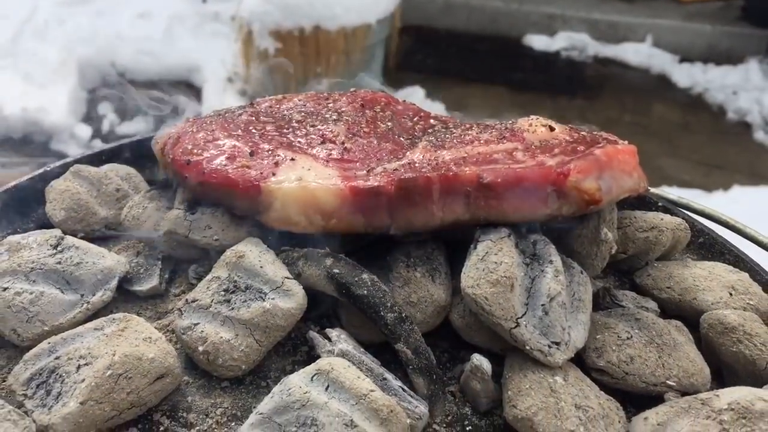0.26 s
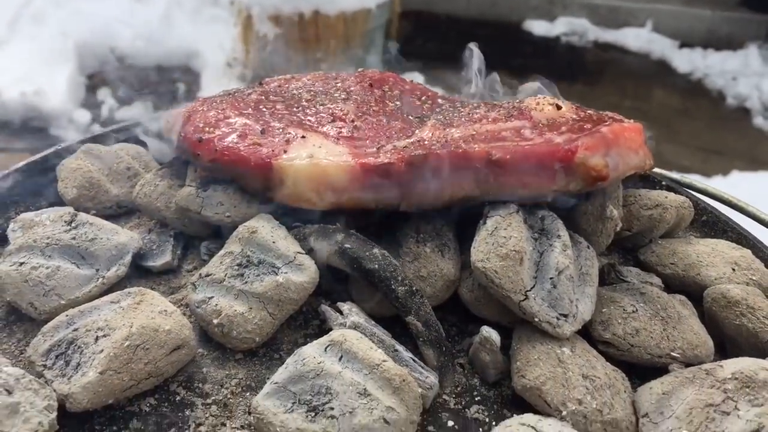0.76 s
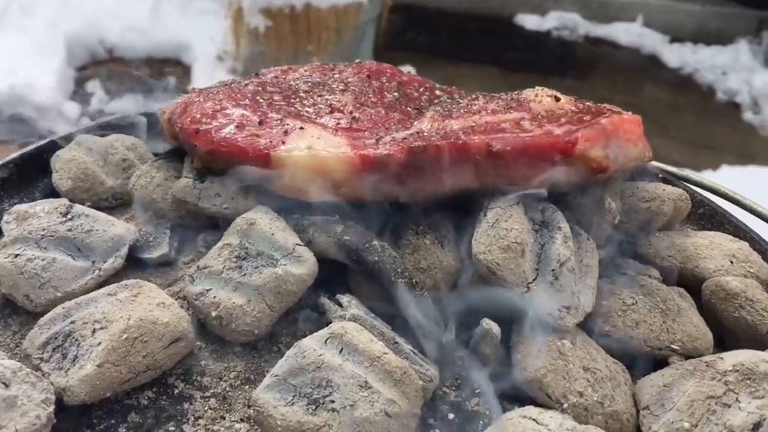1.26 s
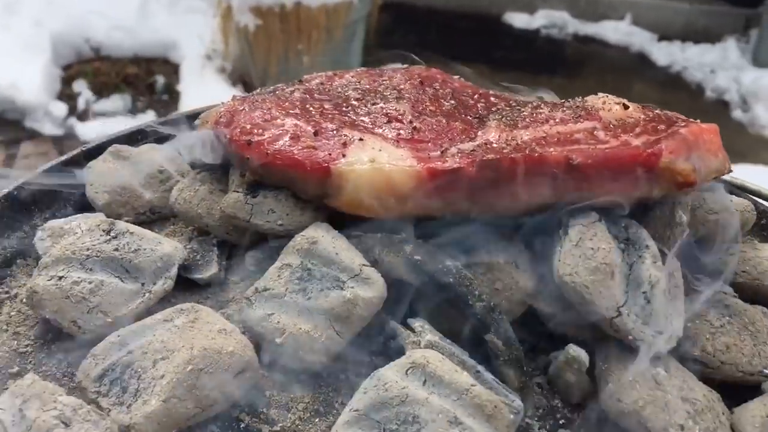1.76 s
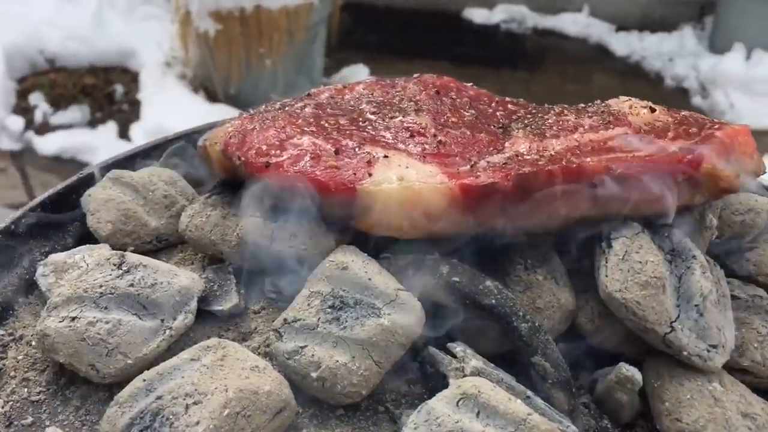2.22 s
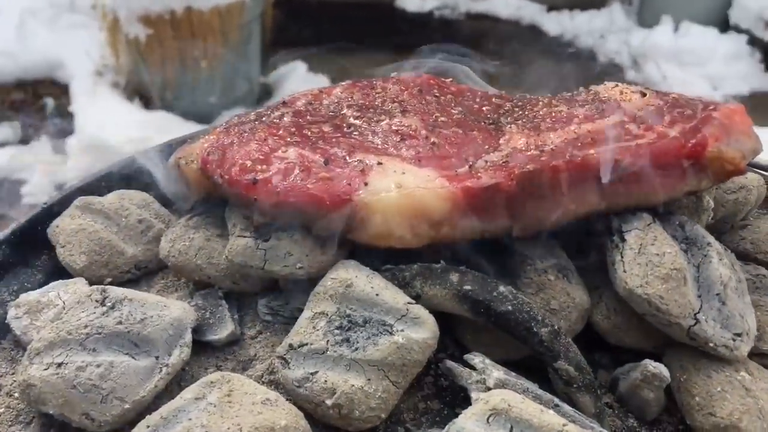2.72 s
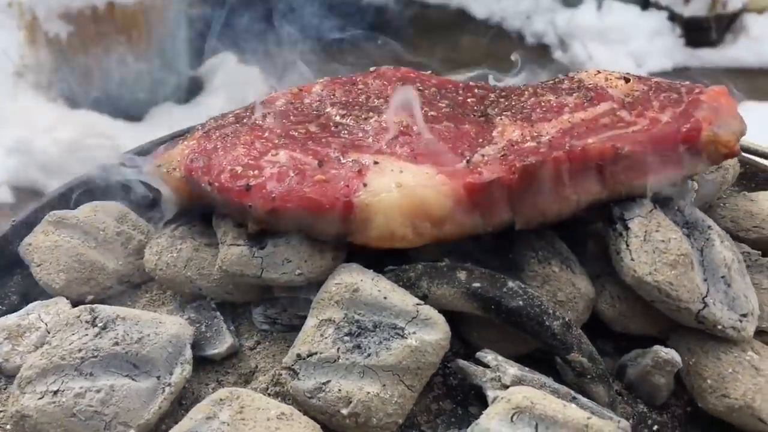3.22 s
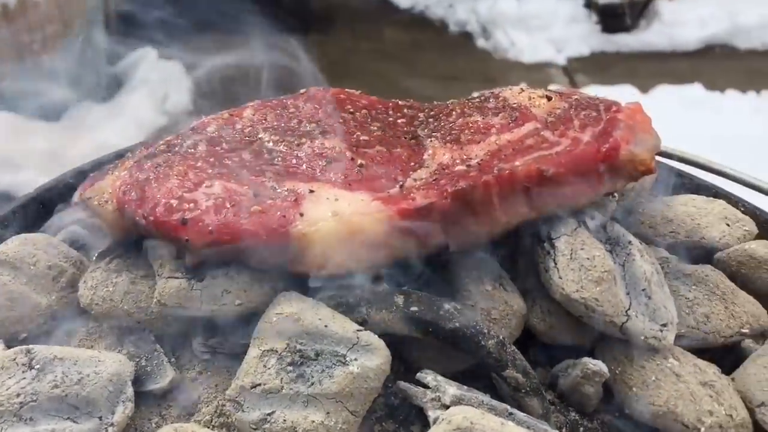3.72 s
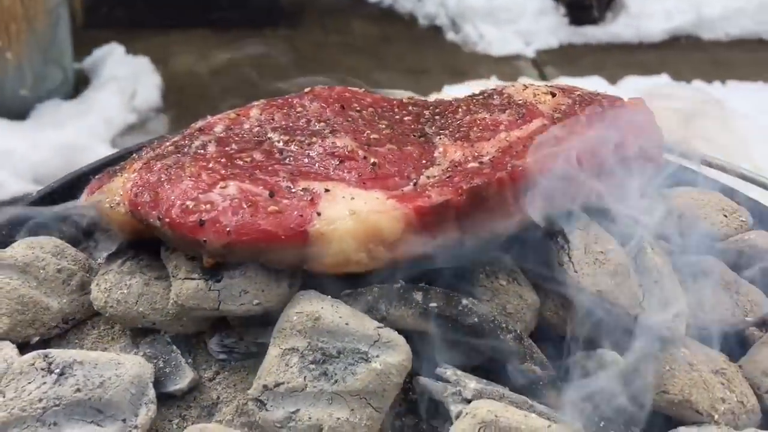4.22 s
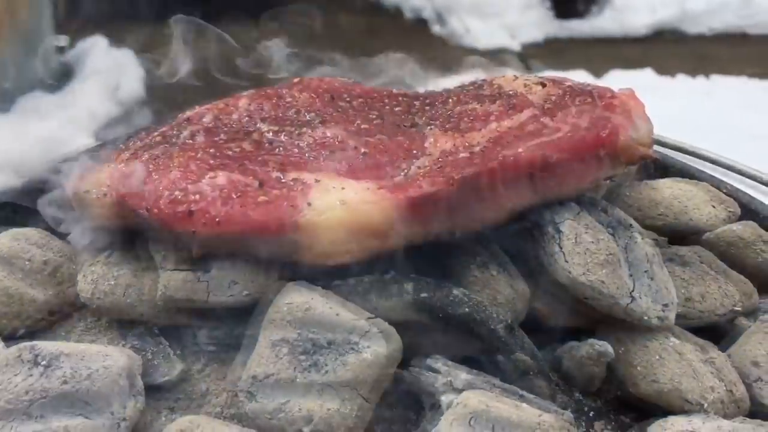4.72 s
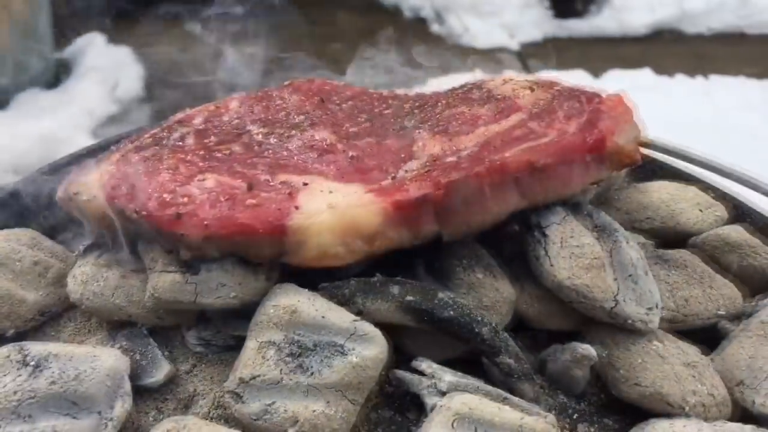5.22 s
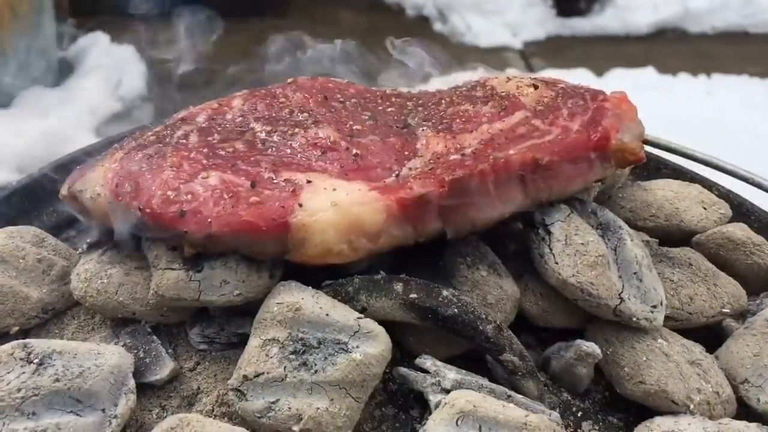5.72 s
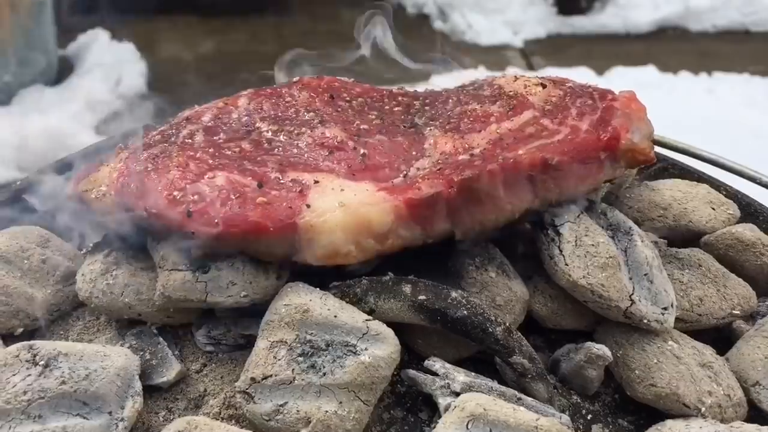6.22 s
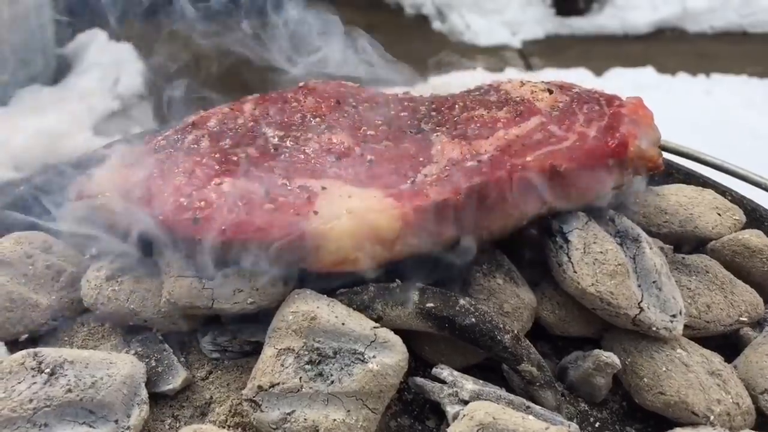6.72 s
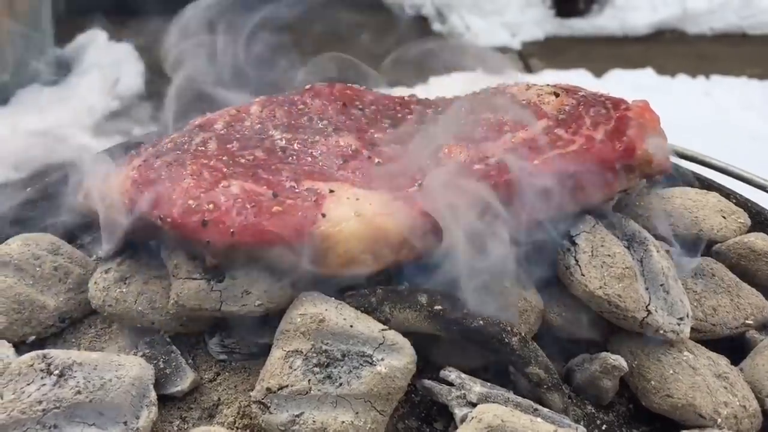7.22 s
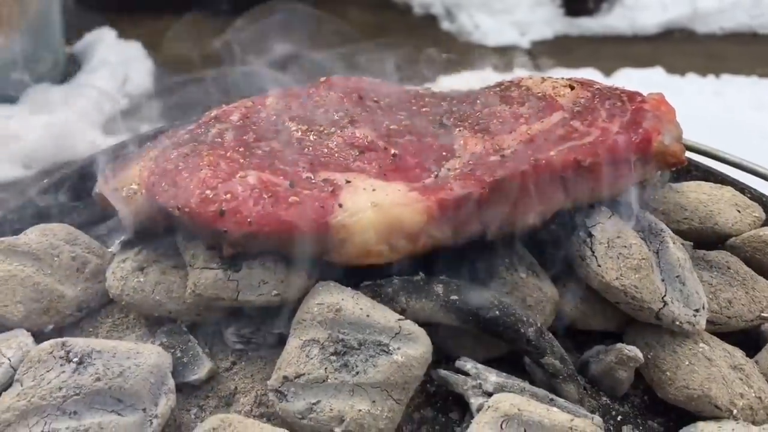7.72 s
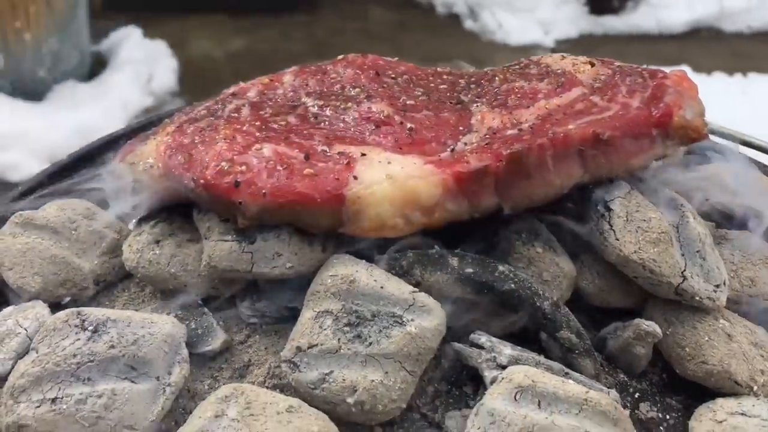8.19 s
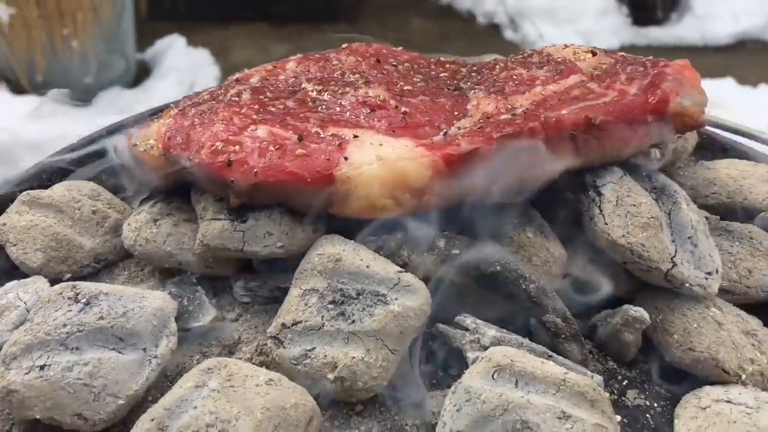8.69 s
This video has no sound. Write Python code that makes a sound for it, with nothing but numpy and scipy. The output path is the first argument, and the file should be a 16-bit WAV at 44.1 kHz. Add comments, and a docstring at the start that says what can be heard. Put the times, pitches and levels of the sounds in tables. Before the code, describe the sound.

Meat sizzles steadily on coals in the open air, with the microphone close to it. From the start, sharp snaps and wet pops break through the crackling hiss, singly and in quick clusters. Past the middle the popping gets busier, with short spits of fat and a few tiny steam whistles. The sizzle ends a little quieter, over a faint rumble of hot air.

```python
"""A steak sears on glowing charcoal outdoors, a phone held close by.
From the start juice boils into a hiss of tiny bursts and pockets of steam and fat pop and spit,
coloured by the gaps between the coals, over a low flutter of hot air with a few puffs.
From 2.8 s fat flares up after some big pops; from 5.8 s pores whistle briefly.
At 7.5 s a faint low drone enters for about a second, and the sizzle ends a little quieter."""
import sys
import numpy as np
from scipy import signal
from scipy.fft import rfft, irfft
from scipy.io import wavfile
from scipy.ndimage import uniform_filter1d

SR = 44100
rng = np.random.default_rng(int(sys.argv[2]) if len(sys.argv) > 2 else 0)


def file_out(sig):
    """Save sig as 16-bit WAV at sys.argv[1]."""
    # one column per channel
    cols = np.atleast_2d(sig).T
    # limit, then scale
    lim = np.clip(cols, -1, 1)
    pcm = np.round(lim * 32767).astype(np.int16)
    wavfile.write(sys.argv[1], SR, pcm)


N = 394694

# response of the gaps between the coals: (frequency [Hz], gain [dB])
COAL_GAPS = [(250, -24), (450, -16), (800, -8), (1550, 0), (2350, -8), (3000, -3), (4200, -4), (4850, -8),
             (6000, -6), (7700, -11), (9400, -11), (10400, -17), (11200, -12), (13500, -10), (15800, -12)]


def undb(db):
    return 10 ** (np.asarray(db) / 20)


def unit_rms(x):
    return x / np.sqrt(np.mean(x ** 2))


def band(x, lo_hz, hi_hz, order=2):
    return signal.sosfilt(signal.butter(order, [lo_hz, hi_hz], "band", fs=SR, output="sos"), x)


def colour(x, response, size=512):
    """Minimum-phase filter (folded cepstrum) along the last axis."""
    hz, db = np.transpose(response)
    gain_db = np.interp(np.log(np.fft.rfftfreq(size, 1 / SR) + 1), np.log(hz), db)
    cepstrum = irfft(np.log(undb(gain_db)))
    cepstrum[1:size // 2] *= 2
    cepstrum[size // 2 + 1:] = 0
    impulse = np.array(irfft(np.exp(rfft(cepstrum))), ndmin=x.ndim)
    return signal.oaconvolve(x, impulse, axes=-1)[..., :x.shape[-1]]


def flicker(rate_hz):
    """Random steps, smoothed twice; RMS 1."""
    hold = int(SR / rate_hz)
    steps = np.repeat(rng.standard_normal(N // hold + 1), hold)
    return unit_rms(uniform_filter1d(uniform_filter1d(steps, hold), hold)[:N])


def bursts(start_s, tear_ms, parts_db, size=1536):
    """Pockets tear open as ragged noise; each band then dies at its own pace, trailed by spray."""
    # thud, thump, knock, snap, spit: (low edge [Hz], high edge [Hz])
    bands_hz = [(90, 420), (450, 1050), (850, 2600), (2400, 6500), (5800, 13600)]
    # ring of each band after the tear: (decay time [ms])
    tails_ms = [7.3, 1.15, 0.42, 0.6, 0.043]
    rise_share, spray_db, spray_ms = 0.27, -21.5, 38
    t_ms = np.arange(size) / SR * 1000
    tear_ms = np.clip(tear_ms, 0.2, 20)[:, None]
    after_ms = np.maximum(t_ms - tear_ms, 0)
    ragged = rng.standard_normal((len(start_s), size))
    ragged *= undb(12 * uniform_filter1d(rng.standard_normal(ragged.shape), size=16))
    rise = np.minimum(t_ms / (rise_share * tear_ms), 1)
    sag = np.exp(-0.5 * np.minimum(t_ms / tear_ms, 1))
    spray = undb(spray_db) * np.exp(-after_ms / spray_ms)
    sound = 0
    for (lo_hz, hi_hz), tail_ms, db in zip(bands_hz, tails_ms, parts_db.T):
        part = ragged * rise * sag * (np.exp(-after_ms / tail_ms) + spray)
        if lo_hz < 400:  # thud: too long a wave for the gaps to colour
            part = band(part, lo_hz, hi_hz, order=1)
        else:
            part = band(colour(part, COAL_GAPS), lo_hz, hi_hz)
        tear_power = np.sum(part ** 2, axis=1, keepdims=True) / (tear_ms * SR / 1000)
        sound = sound + part / np.sqrt(tear_power) * undb(db)[:, None]
    out = np.zeros(N + size)
    index = (start_s * SR).astype(int)[:, None] + np.arange(size)
    np.add.at(out, index, sound * np.hanning(2 * size)[size:])
    return out[:N]


def pops():
    """Loud pockets of steam and fat: tight ones bright, wet ones dark; some spit fat."""
    # (time [s], tearing time [ms], level [dB], brightness [dB], spit re level [dB])
    pockets = [(0.205, 1.14, -35.5, 18, 4), (0.3197, 0.63, -32, 1, 4), (0.3291, 0.98, -35.5, -10.5, 3),
               (0.4373, 0.34, -24.5, -2, 3), (0.473, 0.41, -55, 8, -1), (0.6367, 0.8, -22, -5, -7),
               (0.6635, 2.1, -35, -4.5, 1), (0.7128, 0.91, -33, -5.5, 0), (0.7208, 0.97, -27, -5, -2),
               (0.7583, 0.69, -36.5, -7, -5), (0.7663, 0.81, -26, -6, -8), (0.791, 0.23, -30.5, 2, 13.5),
               (0.8029, 1.37, -18, -4, -16), (0.9306, 0.75, -31.5, -0.5, -2), (0.9853, 0.64, -31.5, -3, -4),
               (1.051, 2.5, -24.5, -5.5, -5.5), (1.3256, 4.1, -22.5, -4.5, -11), (1.3309, 1.6, -32, 0, -8),
               (1.3806, 0.97, -21.5, -5, -4), (1.393, 0.7, -25.5, 3, -3), (1.4701, 1.8, -35, -2, -8),
               (1.4749, 2.9, -25, -4.5, -5), (1.4837, 2.3, -34, 0, -6), (1.6005, 2.3, -32, -1, -13),
               (1.605, 0.57, -20.5, -7, -16), (1.651, 0.9, -31.5, -2.5, -5), (1.694, 0.74, -35, -6, -14),
               (1.9272, 0.34, -24, -1, -6), (1.9327, 0.58, -28, 8, -12), (2.091, 0.51, -17, 2.5, -4),
               (2.1098, 0.72, -29, 13, -7), (2.2663, 0.72, -26.5, -6.5, -5.5), (2.5537, 0.27, -24.5, 11, 3),
               (2.7371, 0.82, -31, -2, -8), (2.7756, 4.5, -14.5, 1, -6), (2.782, 1.2, -29, -2.5, -3),
               (2.7946, 1.6, -38, -3, -9), (2.9018, 0.78, -24, -4.5, 2.5), (2.9984, 0.67, -19.5, 8, 1),
               (3.2222, 0.45, -41, 14, 14), (3.2647, 0.4, -31, -2.5, -12), (3.3102, 1.6, -34, -2, -1),
               (3.3266, 0.6, -34, 3, 1), (3.4706, 0.33, -20.5, -5.5, -5), (3.6775, 0.29, -27, -2, -3),
               (3.7448, 0.34, -20, -1.5, -5), (3.8807, 0.67, -31.5, 5.5, -1), (4.1351, 0.56, -19, -5, -15),
               (4.1412, 0.46, -21, 8, -5), (4.1516, 4.2, -15.5, 0, -2), (4.1592, 2.8, -20, -4, -6),
               (4.2645, 0.26, -29.5, 0.5, 6), (4.4761, 2.8, -31.5, 0.5, 1), (4.5593, 0.9, -33, 0, 2),
               (4.8905, 0.63, -32, -6, 3.5), (5.0039, 0.61, -23.5, 1, -18), (5.2, 1.9, -39, 1, 5),
               (5.2963, 0.42, -29, -5.5, -10), (5.3165, 0.99, -32, -3, -2), (5.5447, 1.05, -31, -5.5, -2),
               (5.6281, 1, -25.5, -2, -13), (5.6532, 0.66, -34, 2, -5), (5.6878, 0.44, -13.5, 4, -6),
               (5.7443, 0.48, -23.5, -6.5, -9), (5.7843, 0.83, -35.5, 4, -2), (6.046, 1.9, -25.5, -3, 4.5),
               (6.0618, 2.5, -26, -2, -4), (6.0688, 0.87, -34, -6, -2), (6.0961, 0.65, -25, -6, -14),
               (6.148, 0.6, -28.5, 3, 6), (6.1604, 1.3, -35, 1, -9), (6.1714, 0.81, -32, 9, 1),
               (6.1831, 1.5, -17.5, 5, -2.5), (6.196, 0.46, -47, 7, 10), (6.2653, 0.49, -21.5, -3.5, 5),
               (6.291, 6.3, -24.5, 0.5, -1), (6.3009, 0.91, -23.5, -8, -1), (6.304, 0.68, -33, 3, -6),
               (6.3267, 3.8, -31.5, 1.5, 3), (6.3655, 0.96, -14.5, -4.5, -3.5),
               (6.4097, 4.6, -28, -3.5, -12), (6.4167, 3.2, -38, 6, -4), (6.4778, 0.86, -32, -3, -5),
               (6.5877, 0.54, -27, 2, -6), (6.6166, 2.5, -32.5, -1, -9), (6.6618, 0.53, -27.5, -0.5, -1),
               (6.6912, 0.71, -34, -1, -14), (6.7182, 0.48, -34, 16, 2), (6.8005, 1.8, -42.5, -6, -10),
               (6.9188, 0.51, -23, -3.5, 2), (6.943, 0.6, -35, -11.5, 10), (6.95, 0.46, -27.5, -3.5, 4),
               (7.0505, 4.7, -16, -4, -1.5), (7.127, 0.7, -32.5, -4, 7), (7.3087, 0.45, -31, -4, -9),
               (7.4889, 0.33, -19.5, 0.5, -27), (7.6012, 1, -38, -7.5, -21), (7.7048, 1.2, -32.5, 6, -12),
               (7.7258, 1.4, -43, -12, -15), (7.7854, 0.96, -17, 2, -12), (8.0866, 0.9, -33, -10, -7),
               (8.2203, 1.33, -15.5, -6.5, -8.5), (8.2364, 0.72, -40, -14, -9),
               (8.2524, 0.63, -30, -0.5, -3), (8.706, 0.43, -25.5, -7.5, -8), (8.7213, 0.91, -18, -1.5, -2),
               (8.83, 0.86, -26, -3.5, -11)]
    # thud to snap: (offset from pop level [dB])
    balance_db = [-23, -10, 0, 1.5]
    # thud to snap: (gain per brightness [dB/dB])
    tilt = [-1.48, -1.6, -0.67, 0.32]
    start_s, tear_ms, level_db, bright_db, spit_db = np.transpose(pockets)
    parts_db = np.column_stack([balance_db + np.outer(bright_db, tilt), spit_db])
    parts_db[:, 0] += 2 * np.log2(np.clip(tear_ms, 0.2, 20))  # a longer tear pushes more air
    tint_db = 1.5 * rng.standard_normal(parts_db.shape)
    return bursts(start_s, tear_ms, level_db[:, None] + parts_db + tint_db)


def crackle(sizzle_db, steam_db, count=2000):
    """Small random pops that follow the boil; each sets off neighbours, giving clusters of five."""
    mean_lag_s, tint_spread_db = 0.025, 5.5
    lag_draw, size_draw, tear_draw = rng.random((count, 3)).T
    cluster_s = rng.random(count // 5).repeat(5) * N / SR
    start_s = np.minimum(cluster_s - mean_lag_s * np.log(1 - lag_draw), (N - 1) / SR)
    at = (start_s * SR).astype(int)
    size_db = np.minimum(-2 * np.log(1 - size_draw), 11) - 0.5
    tear_ms = 0.11 + 1.27 * tear_draw ** 3
    parts_db = np.column_stack([sizzle_db[at, None] + [-18, -12.5, -0.5, -9.5], steam_db[at] + 1.5])
    tint_db = tint_spread_db * rng.standard_normal(parts_db.shape)
    return bursts(start_s, tear_ms, parts_db + size_db[:, None] + tint_db, size=384)


def sizzle(sizzle_db, steam_db):
    """Thousands of tiny bubbles burst; third-octave bands flicker alone and together."""
    common_db = flicker(60)
    bubble_sizes = undb(3.11 * rng.exponential(size=N // 24 + 1).repeat(24)[:N])
    sizzle_swing_db, steam_swing_db = sizzle_db - np.mean(sizzle_db), steam_db - np.mean(steam_db)
    hiss = 0
    for hz in 300 * 2 ** np.arange(0, 5.8, 1 / 3):
        bubbles = unit_rms(band(rng.standard_normal(N) * bubble_sizes, hz / 1.12, hz * 1.12))
        steam_share = np.clip(np.log2(hz / 4000) / 0.86, 0, 1)  # steam jets own the treble
        boil_db = steam_share * (steam_swing_db + 0.51) + (1 - steam_share) * sizzle_swing_db
        hiss = hiss + bubbles * np.sqrt(hz) * undb(boil_db + common_db + 2.5 * flicker(12))
    return unit_rms(colour(hiss, COAL_GAPS)) * undb(np.mean(sizzle_db) + 3.5)


def flares():
    """Fat flares up after a big pop: a bright spitting hiss, sudden, then fading."""
    # (time [s], level [dB], decay time [s])
    flare_ups = [(2.785, -42, 0.037), (4.165, -42.5, 0.097), (6.19, -61, 0.025), (6.37, -46.5, 0.13),
                 (7.054, -32.5, 0.066), (8.224, -43, 0.083)]
    t = np.arange(N) / SR
    envelope = sum(undb(db) * (t > start_s) * np.exp(-np.maximum(t - start_s, 0) / decay_s)
                   for start_s, db, decay_s in flare_ups)
    spit = rng.standard_normal(N) * undb(0.72 * flicker(300))
    return envelope * unit_rms(band(colour(spit, COAL_GAPS), 4900, 18500, order=1))


def whistles():
    """Steam through pores: short, wavering glides."""
    # (time [s], length [s], start pitch [Hz], end pitch [Hz], peak [dB])
    pores = [(5.833, 0.013, 12700, 11800, -39), (5.848, 0.019, 12200, 11600, -42),
             (6.024, .014, 14400, 13000, -47), (7.457, 0.065, 2800, 3600, -47),
             (8.277, .05, 3290, 3470, -44)]
    out = np.zeros(N)
    for start_s, length_s, start_hz, end_hz, peak_db in pores:
        n, at = int(length_s * SR), int(start_s * SR)
        hz = np.linspace(start_hz, end_hz, n) * (1 + 0.021 * flicker(205)[:n])
        out[at:at + n] += undb(peak_db) * np.hanning(n) ** 0.5 * np.sin(2 * np.pi * np.cumsum(hz) / SR)
    return out


def hot_air():
    """Hot air flutters as a low rumble; a few puffs push the microphone."""
    # (frequency [Hz], gain [dB])
    spectrum = [(18, -39), (33, 0), (64, -2), (119, 1.5), (220, -9), (400, -11.5), (700, -30.5)]
    # (time [s], level [dB])
    draught = [(0.0, -63.5), (1.5, -65), (3.6, -64), (6.2, -64), (8.95, -64.5)]
    # (centre time [s], 1/e half-width x 1.46 [s], frequency [Hz], peak [dB])
    puffs = [(0.091, 0.0083, 77, -41.5), (0.364, 0.015, 72, -35), (1.218, 0.015, 56.7, -41.5),
             (7.565, 0.045, 61.6, -54), (7.963, 0.057, 116, -56)]
    t = np.arange(N) / SR
    level_db = np.interp(t, *np.transpose(draught)) + 2.1 * flicker(12)
    air = unit_rms(colour(rng.standard_normal(N), spectrum, size=8192)) * undb(level_db)
    for centre_s, width_s, hz, peak_db in puffs:
        envelope = np.exp(-(1.46 * (t - centre_s) / width_s) ** 2)
        air += undb(peak_db) * envelope * np.cos(2 * np.pi * hz * (t - centre_s))
    return air


def drone():
    """A faint, low, narrow band of noise."""
    start_s, length_s, fade_s, hz, level_db = 7.5, 1.1, 0.06, 179.5, -66.5
    t = np.arange(N) / SR
    gate = np.clip(np.minimum(t - start_s, start_s + length_s - t) / fade_s, 0, 1)
    return gate * undb(level_db) * unit_rms(band(rng.standard_normal(N), hz * 0.946, hz * 1.065))


def scene():
    """All sources at one microphone."""
    # boiling juice: (time [s], sizzle [dB], steam hiss [dB])
    boil = [(0.0, -50.5, -50.5), (0.84, -51.5, -51), (1.2, -51.5, -55.5), (1.54, -46, -49),
            (1.69, -51, -58), (2.42, -51, -55), (2.94, -50.5, -51), (3.49, -54, -56.5),
            (4.26, -51.5, -57.5), (4.56, -54, -61), (5.36, -53, -53.5), (6.03, -52.5, -54),
            (6.28, -47.5, -51), (6.71, -53, -54.5), (7.15, -52.5, -50.5), (7.45, -53.5, -59.5),
            (8.45, -54.5, -58.5), (8.95, -54, -60.5)]
    time_s, *levels_db = np.transpose(boil)
    sizzle_db, steam_db = (np.interp(np.arange(N) / SR, time_s, db) for db in levels_db)
    steak = pops() + crackle(sizzle_db, steam_db) + sizzle(sizzle_db, steam_db) + flares() + whistles()
    return (steak + hot_air() + drone())[None]


def record(dry):
    """The phone drops the deepest bass and cuts the top."""
    low_hz, top_hz = 38, 15700
    thin = signal.sosfilt(signal.butter(3, low_hz, "high", fs=SR, output="sos"), dry)
    return signal.sosfilt(signal.ellip(8, 0.2, 60, top_hz, fs=SR, output="sos"), thin)


dry = scene()
out = record(dry)
file_out(out)
```